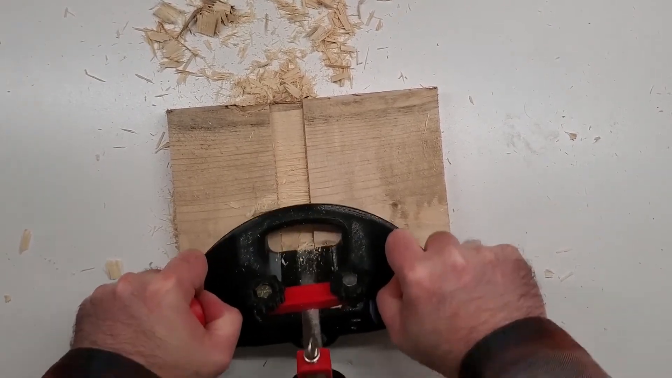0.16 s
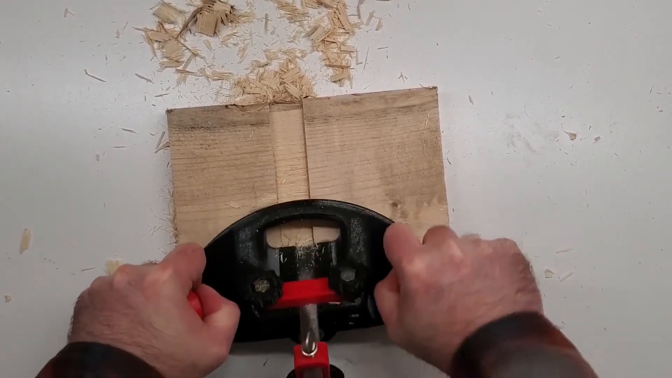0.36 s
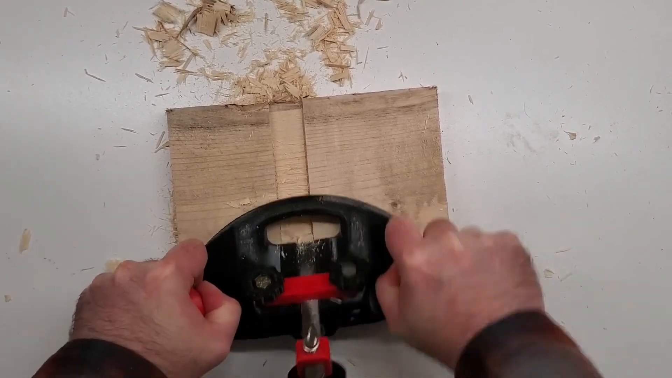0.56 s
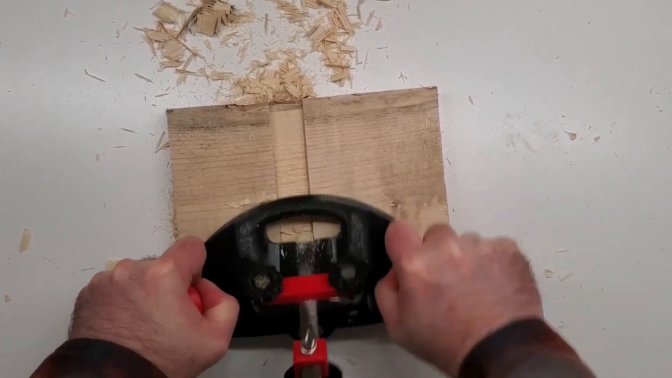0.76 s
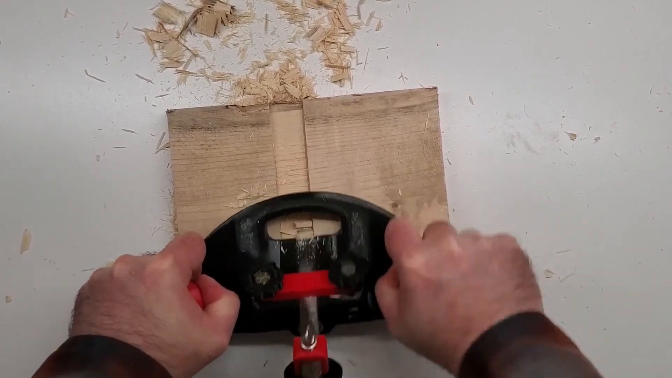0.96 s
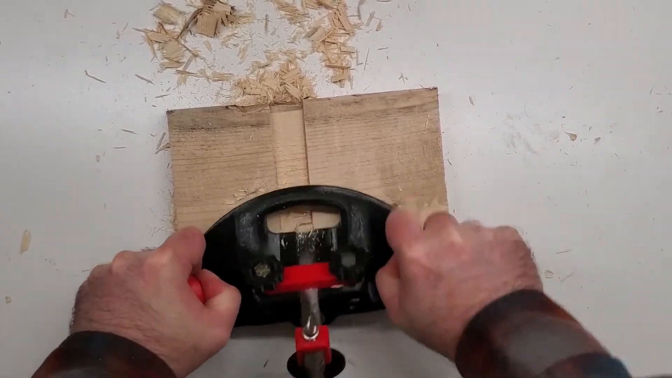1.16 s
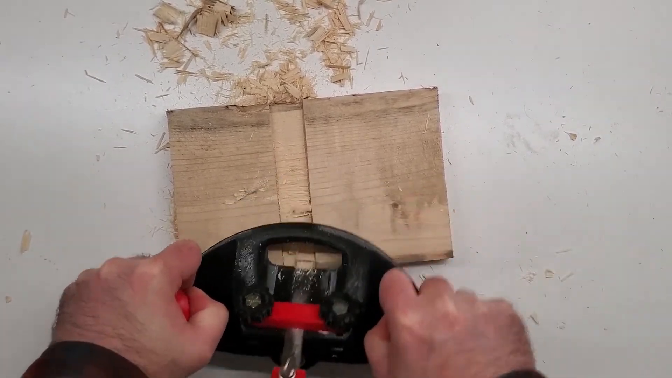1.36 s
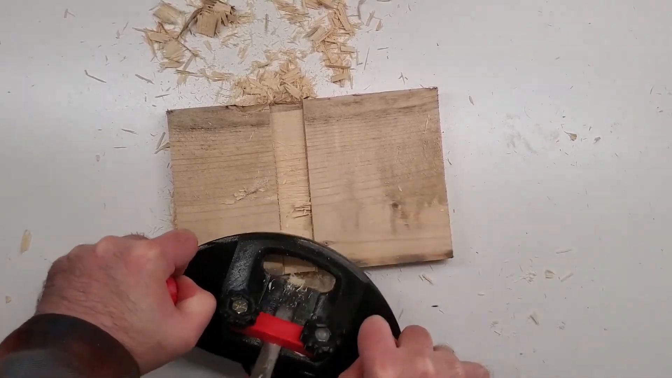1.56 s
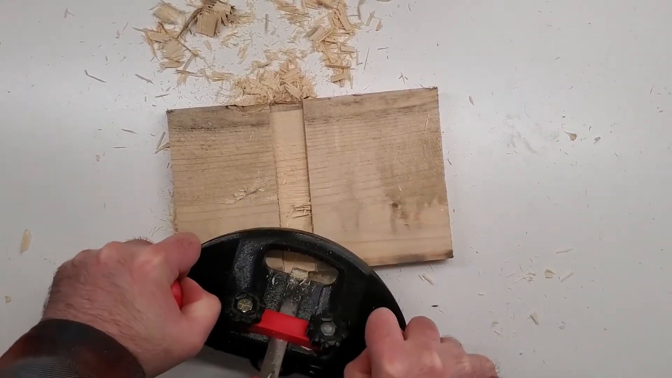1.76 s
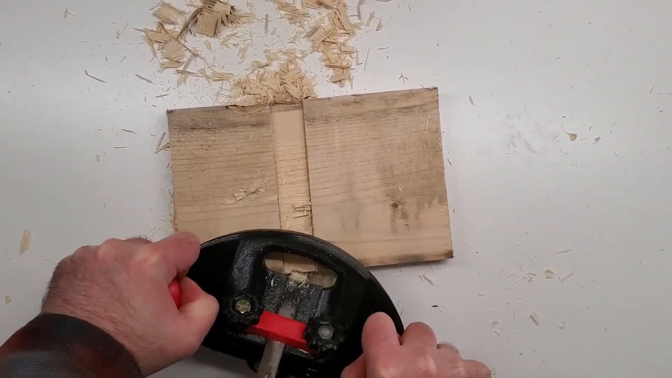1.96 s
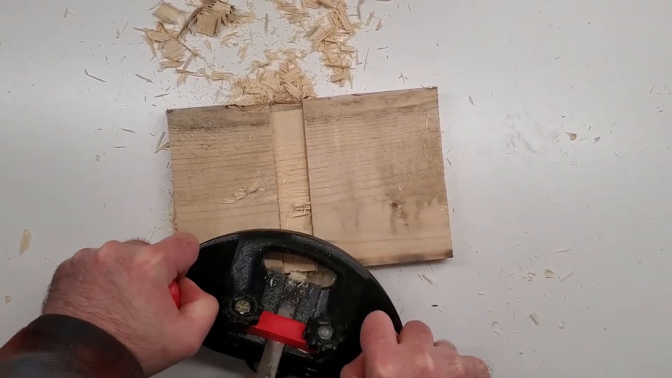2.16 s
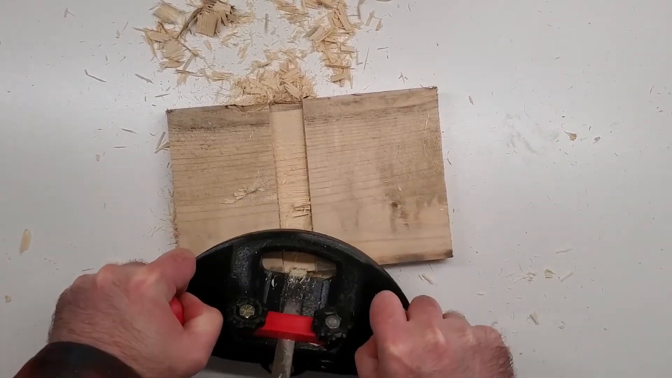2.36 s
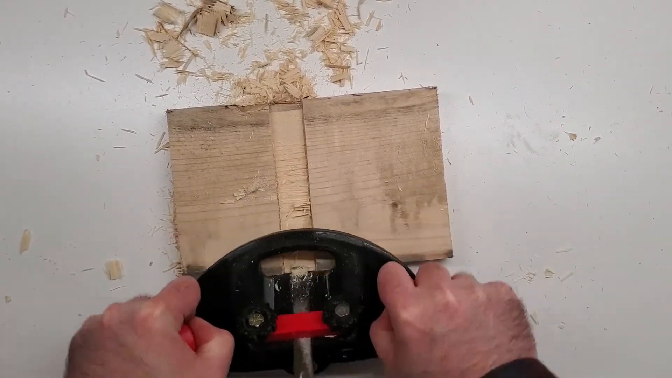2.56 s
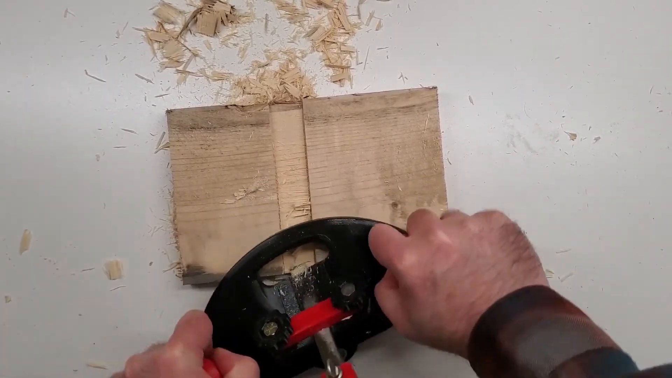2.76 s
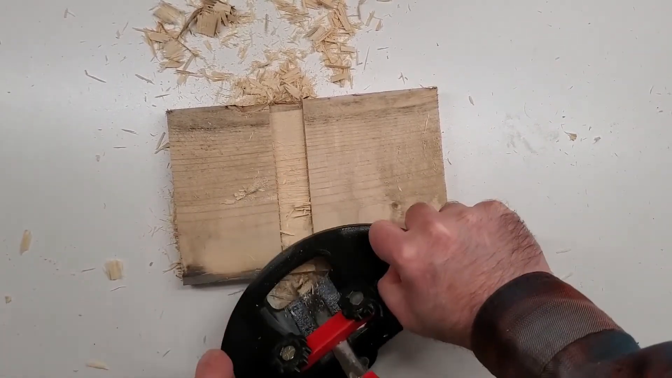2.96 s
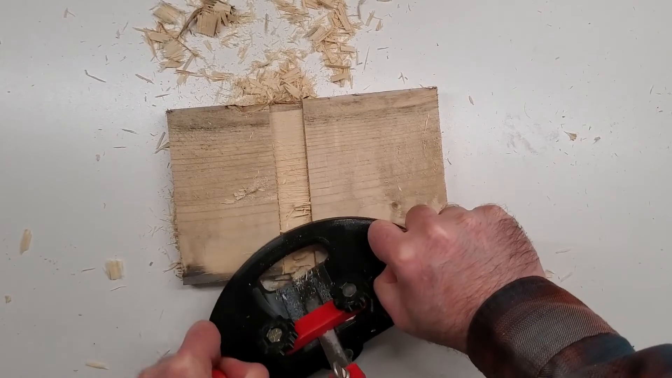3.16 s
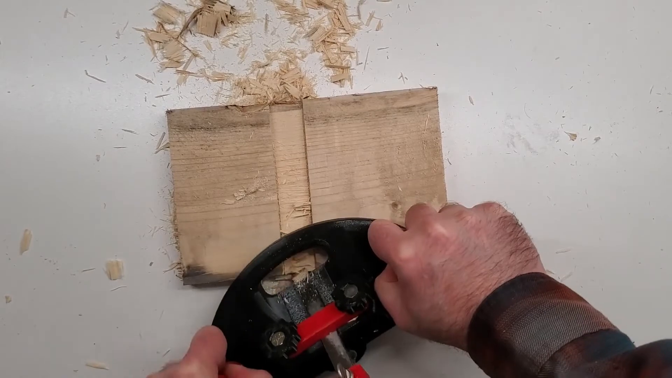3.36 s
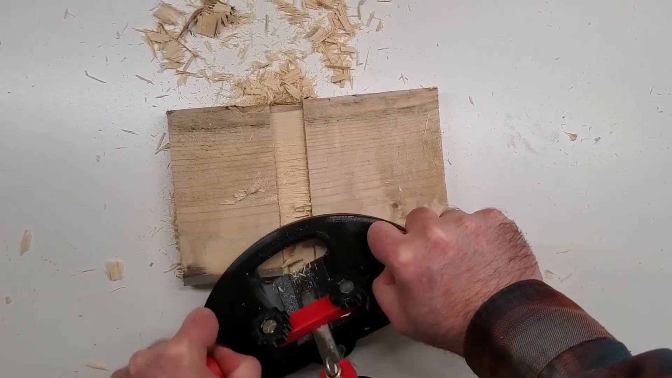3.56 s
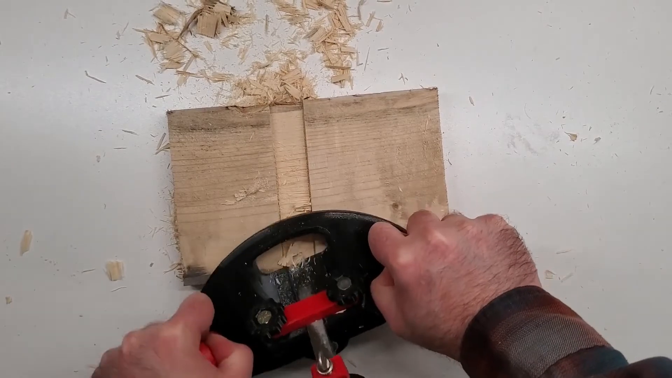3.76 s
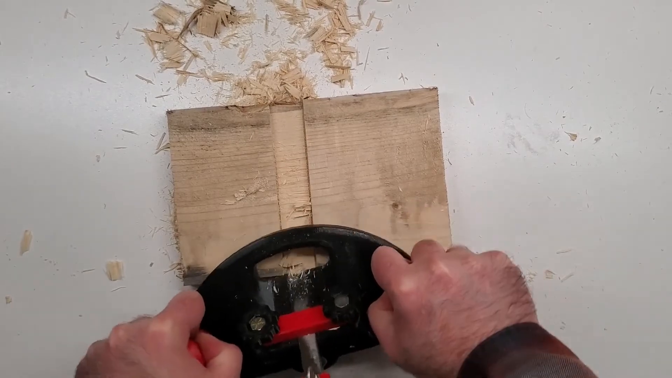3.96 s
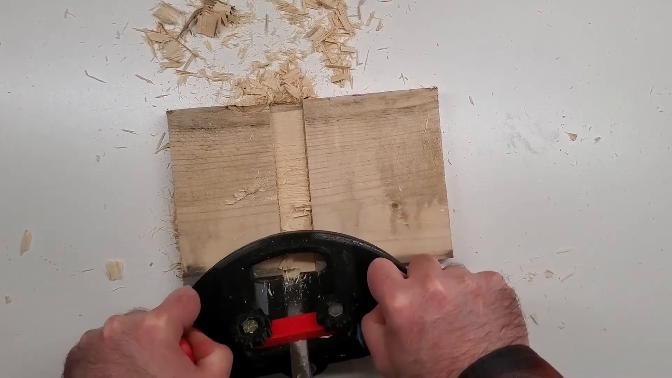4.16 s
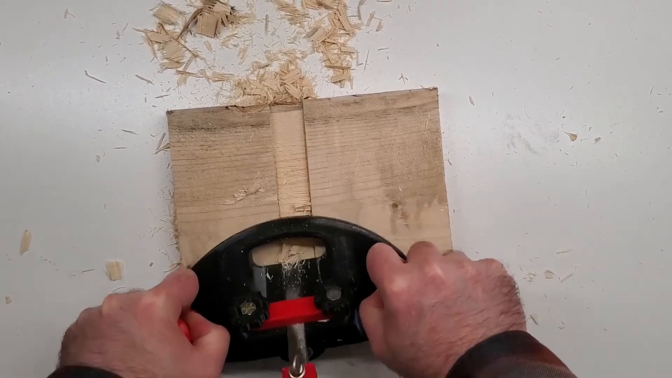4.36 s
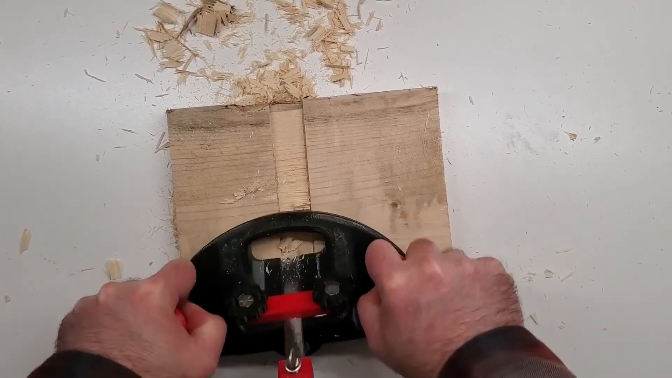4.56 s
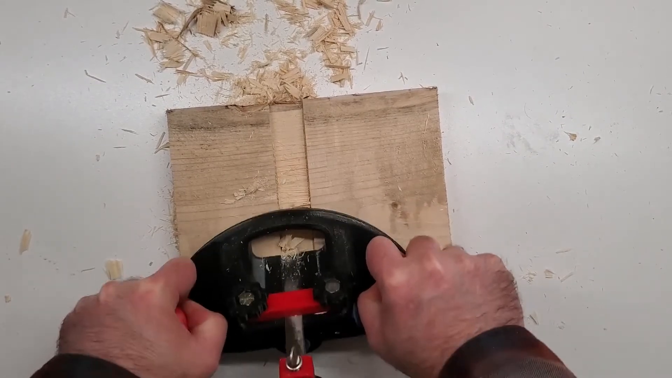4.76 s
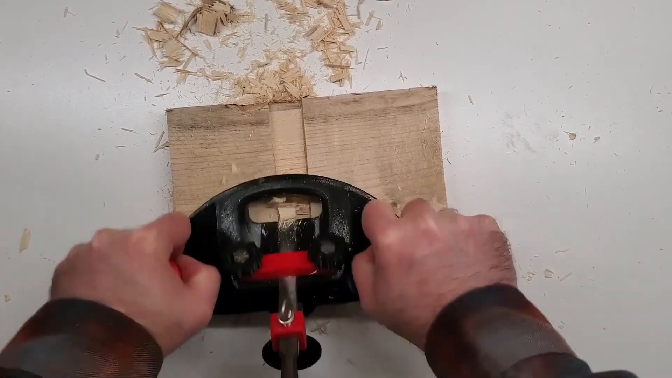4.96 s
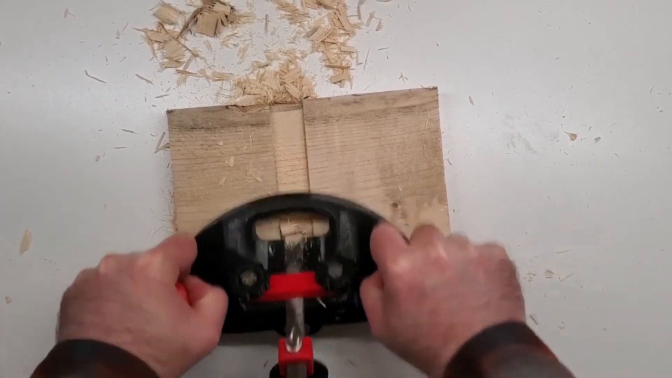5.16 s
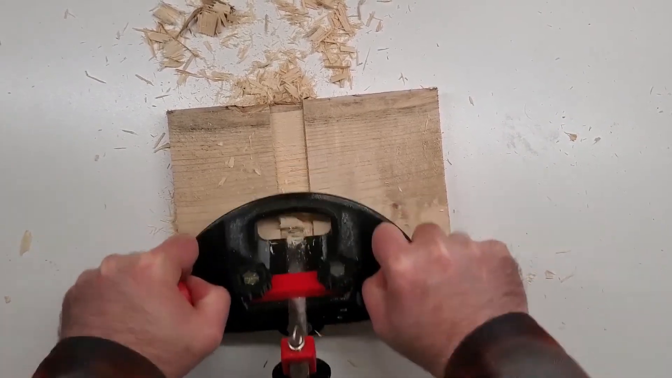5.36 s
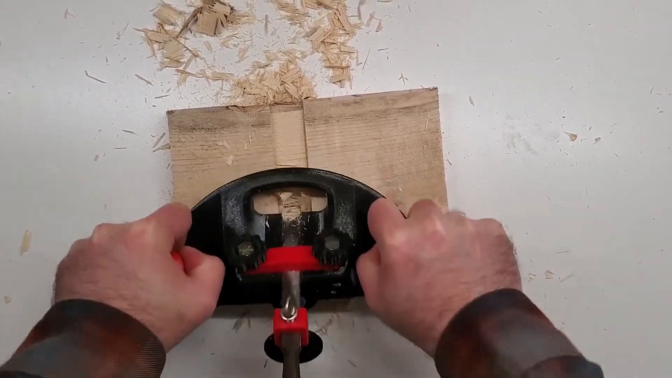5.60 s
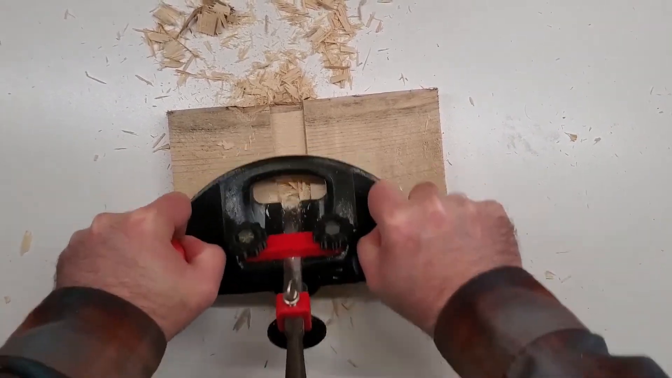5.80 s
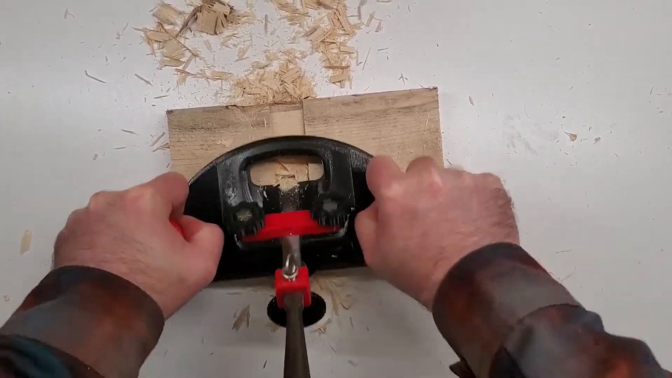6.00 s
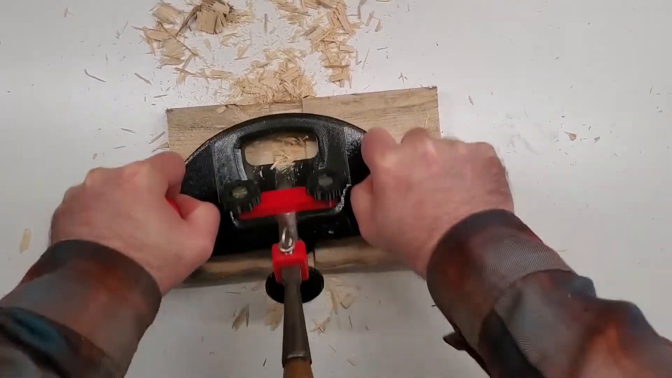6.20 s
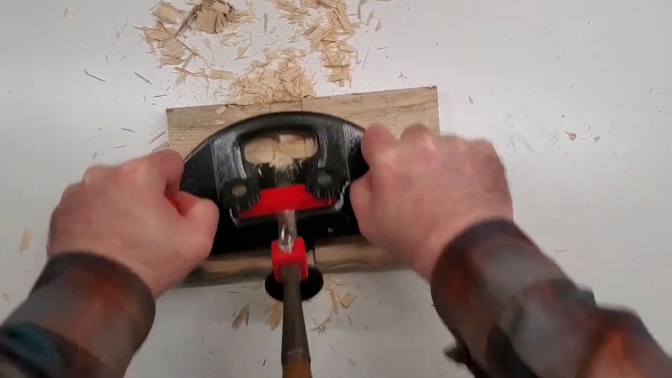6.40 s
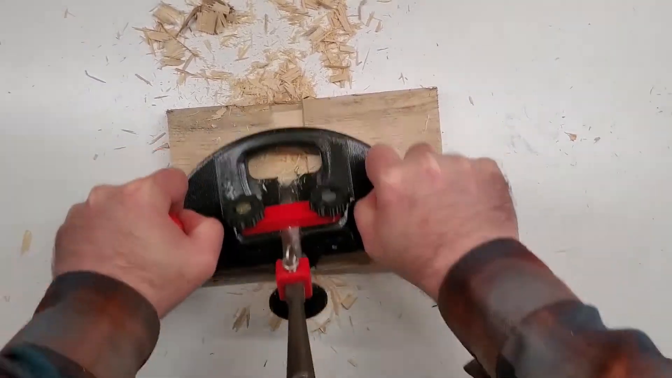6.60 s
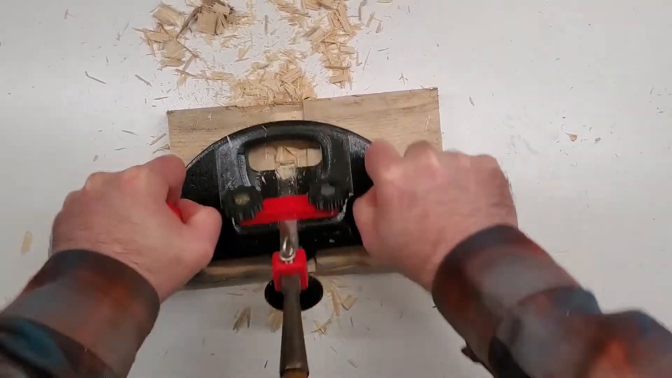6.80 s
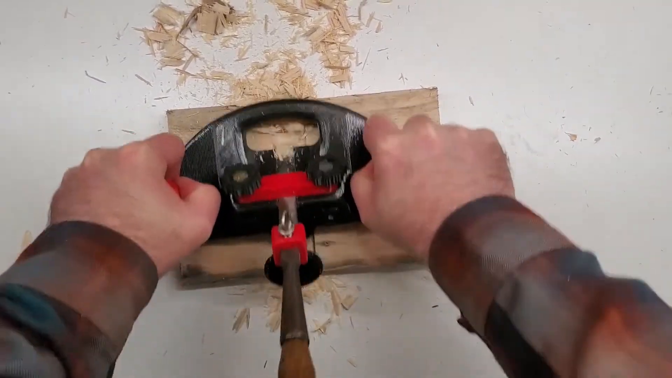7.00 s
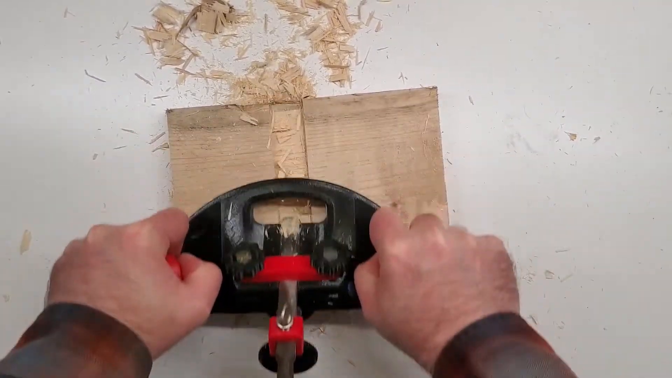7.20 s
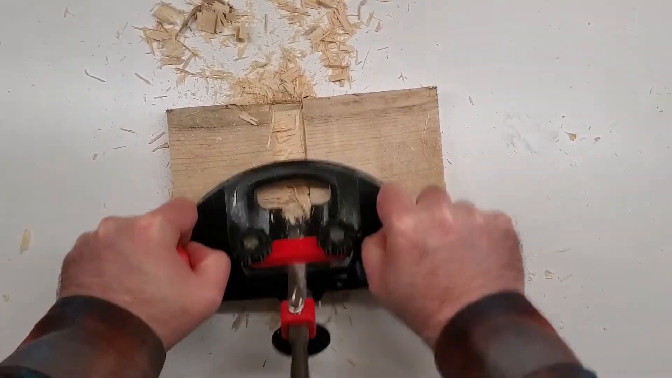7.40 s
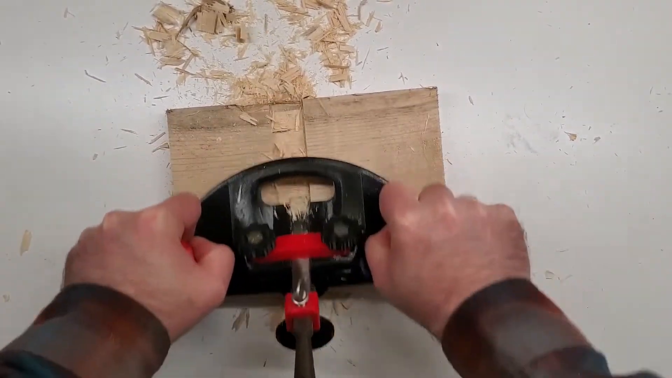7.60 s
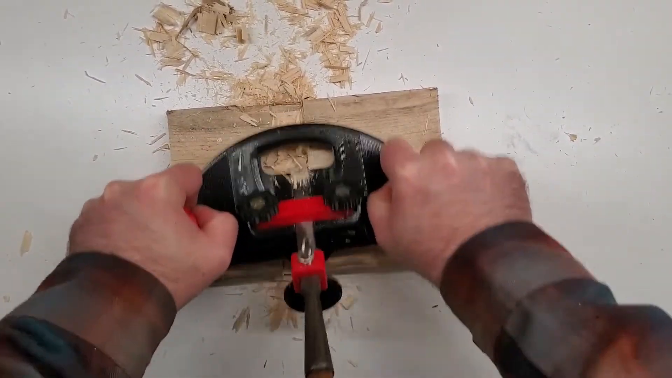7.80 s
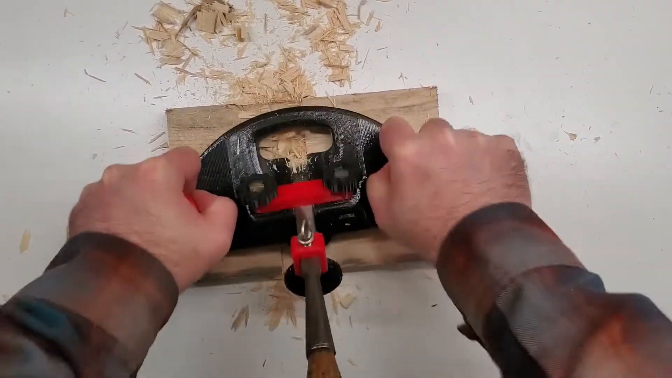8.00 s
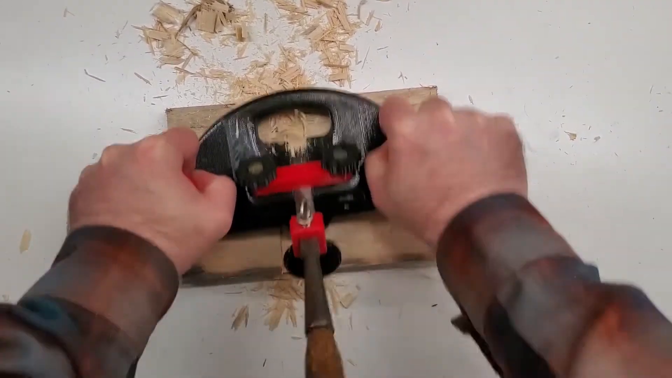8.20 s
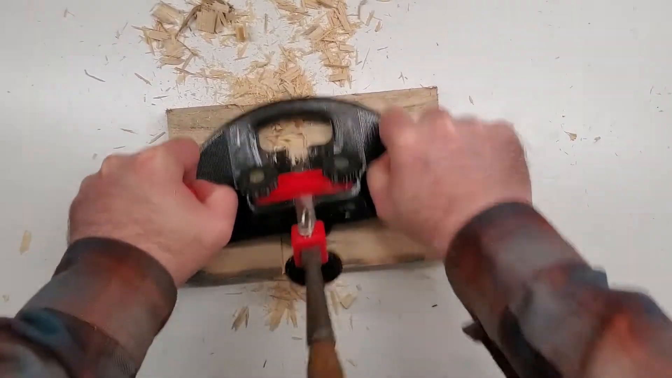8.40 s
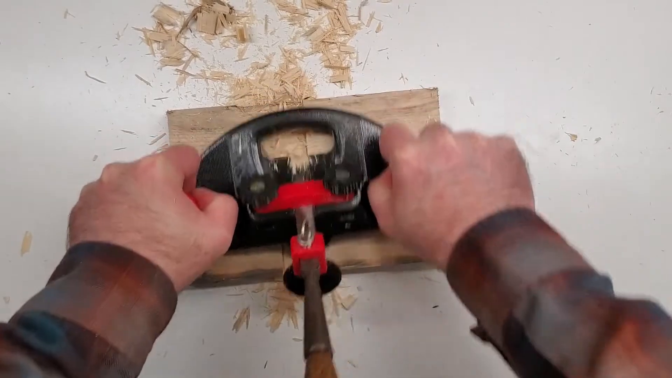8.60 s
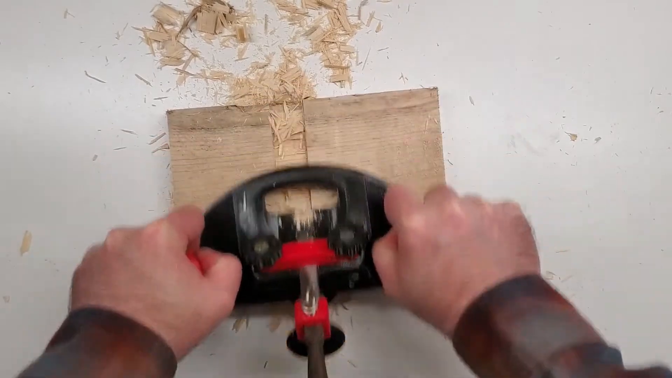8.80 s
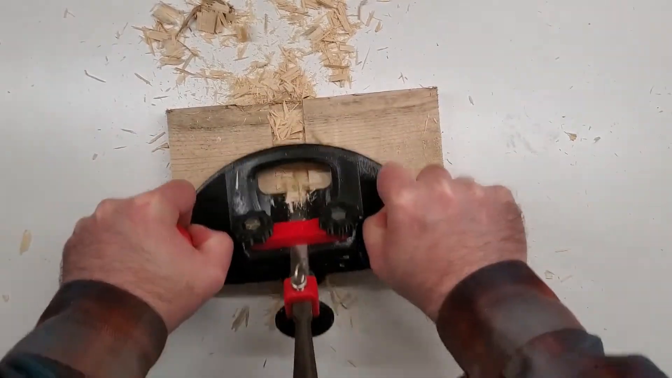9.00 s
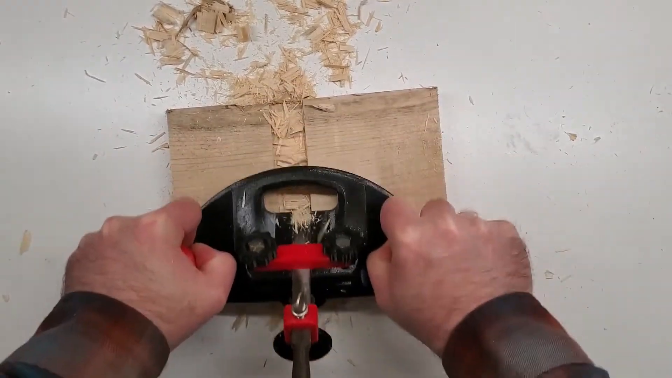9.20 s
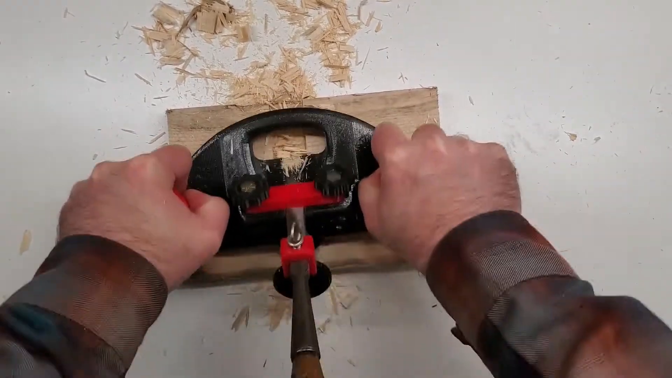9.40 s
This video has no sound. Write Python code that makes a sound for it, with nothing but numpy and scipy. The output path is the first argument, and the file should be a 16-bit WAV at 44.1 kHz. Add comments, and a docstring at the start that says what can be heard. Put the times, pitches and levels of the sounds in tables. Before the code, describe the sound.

Close up in a small workshop, a hand plane pares a wooden groove in short tearing shoves, about four a second. After a second it stops, leaving faint sliding and near silence, then tries a few light strokes. From the middle onward the cuts return louder, with crisp fibre snaps, dull board thuds, softer drags back and a low hollow bench boom. A close stereo microphone pair catches it, with little reverberation.

```python
"""Tearing scrapes first: a router plane pares a groove floor in quick shoves, about four a second, then pauses
and resumes. Tearing, pushing and hissing are grainy noises through blade and board modes and a fine spectrum.
Snaps are noise bursts, thuds soft pushes; the sole drags back and the hollow bench top booms under the shoves.
A small workshop's short noise tail and still air surround it; a close microphone pair hears all."""
import sys
import numpy as np
from scipy import signal
from scipy.fft import rfft, irfft, next_fast_len
from scipy.io import wavfile
from scipy.ndimage import uniform_filter1d

SR = 44100
rng = np.random.default_rng(int(sys.argv[2]) if len(sys.argv) > 2 else 0)


def bounce(signal):
    """Save signal as a 16-bit WAV file at the path given by the first command-line argument."""
    frames = np.transpose(np.atleast_2d(signal))
    limited = np.clip(frames, -1, 1)
    pcm = np.round(limited * 32767).astype(np.int16)
    wavfile.write(sys.argv[1], SR, pcm)


N = 416744  # samples


def gain_of(db):
    """Decibels to gain."""
    return 10 ** (np.asarray(db) / 20)


def read(points, hz):
    """Table value interpolated over log frequency."""
    table_hz, value = np.transpose(points)
    return np.interp(np.log(hz + 1), np.log(table_hz + 1), value)


def through(x, taps):
    """Convolution along time."""
    return signal.oaconvolve(x, np.atleast_2d(taps), axes=1)[:, :N]


def colour(points, size=4096):
    """Causal (minimum-phase) impulse response of unit energy with the given spectrum."""
    hz = abs(np.fft.fftfreq(size, 1 / SR))
    log_gain = np.log(gain_of(np.maximum(read(points, hz), -100)))
    spectrum = np.exp(np.conj(signal.hilbert(log_gain)))
    taps = np.fft.ifft(spectrum).real[:size // 2]
    return taps / np.linalg.norm(taps)


def ring(modes, size=8192):
    """Impulse response of unit energy: decaying sines, wider modes dying sooner."""
    t = np.arange(size) / SR
    taps = np.zeros(size)
    for hz, width_hz, db in modes:
        decay = np.exp(-np.pi * width_hz * t)
        taps += gain_of(db) * np.sqrt(width_hz) * decay * np.sin(2 * np.pi * hz * t)
    return taps / np.linalg.norm(taps)


def rings(modes, force, size):
    """Each mode rings with its own force(hz); the mode gains have unit total energy."""
    share = gain_of([db for hz, width_hz, db in modes])
    share = share / np.linalg.norm(share)
    return sum(through(force(hz), gain * ring([(hz, width_hz, 0)], size=size))
               for (hz, width_hz, db), gain in zip(modes, share))


def nearness(hz, favoured_hz, octaves):
    """1 for a mode at the favoured pitch, falling off on both sides."""
    return np.exp(-.5 * (np.log2(hz / favoured_hz) / octaves) ** 2)


def drift(depth_db, knot_ms):
    """A wandering gain: random dB values joined by straight lines."""
    knots = np.arange(0, N + SR, knot_ms * SR / 1000)
    return gain_of(depth_db * np.interp(np.arange(N), knots, rng.standard_normal(len(knots))))


def grains(per_s, spread_db, smooth, clump_db, clump_ms):
    """Two rows (mid, side) of tiny fractures that come in clumps over a smooth rub; power 1."""
    size = gain_of(spread_db * np.minimum(rng.exponential(1, N), 5))
    size = size * (rng.random(N) < per_s / SR)
    power = smooth + (1 - smooth) * size ** 2 / np.mean(size ** 2)
    size = np.sqrt(power) * drift(clump_db, clump_ms)
    return size / np.sqrt(np.mean(size ** 2)) * rng.standard_normal((2, N))


def blows(s, shapes):
    """Lays one short force (mid, side) at each moment, times a strength per blow."""
    at = np.round(s * SR).astype(int)[:, None] + np.arange(shapes.shape[-1])

    def force(strength):
        out = np.zeros((2, N + shapes.shape[-1]))
        np.add.at(out, (slice(None), at), np.moveaxis(shapes * strength[:, None, None], 1, 0))
        return out
    return force


# still air spectrum: hz, density_db (relative)
AIR_SPECTRUM = [(15, -26), (25, -6), (70, -6.5), (242, 1), (317, -14), (394, -2.5), (575, -9), (2410, -24),
                (6380, -42), (14800, -33.5), (16000, -36.5)]
AIR_DB = -67.5


def still_air():
    """Steady noise of the air, independent in mid and side."""
    return gain_of(AIR_DB) * through(rng.standard_normal((2, N)), colour(AIR_SPECTRUM))


# workshop decay: hz, t60_s
ROOM_DECAY = [(100, 0.17), (500, 0.29), (3000, 0.27), (10000, 0.22)]


def room(x):
    """Sparse taps of random sign, each band dying at its own speed."""
    taps = np.zeros((2, SR // 2))
    at = np.arange(200, SR // 2 - 20, 20)
    at = at + rng.integers(0, 20, (2, len(at)))
    np.put_along_axis(taps, at, rng.choice([-1., 1.], at.shape), 1)
    hz, t, bands = signal.stft(taps, SR, nperseg=256)
    t60_s = np.maximum(read(ROOM_DECAY, hz), .05)[:, None]
    tail = signal.istft(bands * gain_of(-60 * t / t60_s), SR, nperseg=256)[1]
    return through(x, tail / np.linalg.norm(tail[0]))


# faint rub of the tool lying on the work between strokes: start_s, rub_db, rock_db (relative levels)
REST = [(0, -55, -34.5), (1.3, -49.5, -33), (1.46, -67.5, -60), (1.7, -74, -64), (1.8, -72, -58),
        (2.1, -86, -71), (2.16, -62, -62), (2.45, -68, -49), (2.9, -70, -53), (3.15, -72.5, -64),
        (3.3, -60.5, -36), (4.0, -51, -42.5), (4.25, -69.5, -61), (4.4, -46.5, -35), (7.2, -66, -40),
        (7.42, -50.5, -52), (7.5, -44, -42), (9.2, -57.5, -38), (9.35, -52.5, -48)]


def effort(rest_db, *kinds):
    """Gain over time: strokes rise, glide from first to last level and fall; powers add over the rest."""
    t = np.arange(0, N / SR + .01, .001)
    power = gain_of(2 * np.interp(t, np.transpose(REST)[0], rest_db))
    for start, end, first_db, last_db, (rise_db_per_s, fall_db_per_s) in kinds:
        for a, b, c, d in zip(start, end, first_db, last_db):
            level_db = np.interp(t, [a - 1, a, b, b + 1], [c - rise_db_per_s, c, d, d - fall_db_per_s])
            power = power + gain_of(2 * level_db)
    return np.interp(np.arange(N) / SR, t, np.sqrt(power))


# lowest bench top modes: hz, width_hz, level_db
BENCH_MODES = [(39.6, 16, -8), (56.9, 2.7, 0.5), (71.3, 10.6, 8.5), (92.4, 22, 8.5)]
# forward cuts, relative levels: bite_s, let_go_s, bite_tear_db, let_go_tear_db, push_re_tear_db,
# fine_hiss_re_tear_db, bench_rock_db, chatter_hz, chatter_lift_db
SHOVES = [ (0.0, 0.005, -20.5, -30.5, 7, -13, -16, 1500, -1),
          (0.208, 0.249, -28.5, -35, 12, -9, -21.5, 2240, 20),
          (0.443, 0.482, -26, -29, 7.5, -11.5, -17, 1500, -6),
          (0.652, 0.694, -29, -22, 5.5, -13.5, -25, 1520, -5),
          (0.867, 0.915, -35.5, -22.5, 6.5, -15, -25.5, 1470, -6),
          (1.09, 1.137, -34, -22, 0.5, -14, -26.5, 1060, 9),
          (2.33, 2.334, -36.5, -36, 0, -9, -33, 1500, -1),
          (2.581, 2.671, -47, -44.5, 8.5, -7.5, -38.5, 2600, 7.5),
          (3.266, 3.287, -41, -29, 2, -11.5, -30, 1200, 0),
          (3.514, 3.548, -32, -28, 8.5, -8.5, -21.5, 1180, 14),
          (3.752, 3.797, -38, -32, 5, -13, -19.5, 1600, 8),
          (4.34, 4.379, -36.5, -26, 8, -11.5, -30, 1270, 4),
          (4.593, 4.625, -31, -26.5, 11, -13, -17.5, 3200, 1),
          (4.78, 4.794, -30.5, -23, 9, -11, -20.5, 1500, -8),
          (5.003, 5.041, -20.5, -15.5, 5.5, -8.5, -17, 1500, -28),
          (5.293, 5.317, -26, -23.5, 8, -14, -17, 1810, 11),
          (5.51, 5.534, -21, -17, 3.5, -10.5, -14, 1507, -15),
          (5.748, 5.8, -27.5, -29, 10.5, -11.5, -18.5, 1890, 6),
          (5.979, 6.025, -24, -28, 12, -11, -18, 1070, 8.5),
          (6.203, 6.23, -28.5, -19.5, 6.5, -7.5, -21.5, 1630, 8.5),
          (6.233, 6.261, -23, -27.5, 9.5, -7.5, -20.5, 3030, 3),
          (6.466, 6.534, -31.5, -22, 5.5, -13.5, -19.5, 1480, 8),
          (6.707, 6.774, -33.5, -21.5, 9.5, -15, -18, 1492, 0),
          (6.976, 7.01, -28.5, -25, 8.5, -12.5, -17.5, 1070, 15.5),
          (7.253, 7.259, -38, -34.5, 10, -12, -32, 1300, 3),
          (7.475, 7.498, -26, -29.5, 13.5, -15, -23, 1260, 5.5),
          (7.527, 7.562, -24, -26, 6, -12.5, -22.5, 1497, 0),
          (7.773, 7.819, -29.5, -24.5, 9.5, -10, -20, 1395, 12),
          (7.999, 8.044, -34.5, -26.5, 10.5, -11, -25.5, 1600, 10),
          (8.27, 8.298, -17.5, -24, 5.5, -15.5, -16.5, 1157, 16),
          (8.498, 8.538, -38, -31, 8, -10.5, -27, 1190, 20),
          (9.026, 9.111, -31.5, -33, 11, -9, -21, 1874, 16.5),
          (9.393, 9.448, -27.5, -33, 8, -12.5, -32.5, 1820, 6)]
# sole sliding without cutting, relative levels: start_s, end_s, rub_db, push_re_rub_db, fine_hiss_re_rub_db
DRAGS = [ (0.077, 0.12, -37.5, 7, -22), (0.32, 0.37, -39, 11, -15), (0.556, 0.59, -41, 11.5, -17),
         (0.78, 0.808, -38.5, 11, -14.5), (0.994, 1.03, -43.5, 10, -9), (1.208, 1.328, -48, 6.5, -9),
         (1.379, 1.393, -45.5, 1, -17), (1.752, 1.757, -57, 7, -19), (1.985, 1.989, -62, -4.5, -22),
         (2.16, 2.15, -53, 14.5, -25), (2.211, 2.265, -50, 6, -16.5), (2.37, 2.445, -59, 10, -9),
         (2.707, 2.884, -51, 5.5, -11.5), (2.986, 3.021, -46.5, 7.5, -18.5), (3.32, 3.407, -44, 9, -13),
         (3.585, 3.7, -49, 10, -16), (3.952, 3.986, -45.5, 5.5, -15.5), (4.032, 4.102, -54.5, -8, -19),
         (4.13, 4.2, -61, 5, -26), (4.497, 4.53, -39, 7.5, -17.5), (4.894, 4.934, -48.5, 12.5, -12),
         (5.153, 5.23, -44.5, 10.5, -6.5), (5.256, 5.278, -36.5, 9, -14), (5.365, 5.433, -42, 11.5, -9),
         (5.586, 5.67, -46, 6, -10), (5.853, 5.918, -45.5, 10, -7), (6.08, 6.147, -45, 15, -9),
         (6.356, 6.41, -41, 5.5, -8), (6.601, 6.651, -40, 10, -9), (6.82, 6.922, -40.5, 5.5, -10.5),
         (6.954, 6.968, -32, 5, -13), (7.086, 7.22, -36, 7.5, -12.5), (7.283, 7.343, -45.5, 8, -15),
         (7.64, 7.692, -42.5, 12, -9.5), (7.903, 7.932, -38.5, 7, -10), (8.153, 8.249, -45, 0, -8),
         (8.373, 8.422, -42, 5, -11), (8.623, 8.718, -43.5, 9, -9.5), (8.753, 8.83, -45.5, 3, -9),
         (8.815, 8.866, -46.5, 16.5, -3), (8.885, 8.924, -44.5, 17.5, -8), (8.989, 9.001, -46, 13.5, -10),
         (9.183, 9.278, -41.5, 10, -10)]
# (rise, fall) in dB per s around a stroke
CUT_ROCK, SLIDE_PUSH = (970, 243), (740, 570)
SLIDE_ROCK_DB = -4.5  # re rub


def bench():
    """Uneven shoves rock the bench top in its lowest modes, hardest as the blade lets go."""
    bite, go, _, _, _, _, rock_db, _, _ = np.transpose(SHOVES)
    start, end, rub_db = np.transpose(DRAGS)[:3]
    slide_db = rub_db + SLIDE_ROCK_DB
    rock = effort(np.transpose(REST)[2],
                  (bite, go, rock_db - 6.0, rock_db, CUT_ROCK),
                  (start, end, slide_db, slide_db, SLIDE_PUSH))
    force = grains(300, 1.3, 0.55, 2.3, 24.0) * rock
    return through(force, ring(BENCH_MODES, size=16384))


# board modes: hz, width_hz, level_db
BOARD_MODES = [(149.5, 17, -5), (175, 39, -8), (213.7, 24, -1), (246, 37, -1.5), (287.2, 55, 0),
               (326.7, 87, -4), (391.7, 19.4, 0.5), (478.6, 58, -7.5), (530, 210, -20.5)]
# blade catches and jolts the board: start_s, level_db (relative), favoured_hz
THUDS = [(0.227, -8.5, 250), (0.316, -21.5, 244), (0.464, -9, 230), (0.65, -15, 255), (0.673, -6, 208),
         (0.895, -10, 228), (0.91, -6, 229), (1.095, -15.5, 277), (1.13, -7, 230), (2.575, -29, 480),
         (3.282, -20, 390), (3.516, -14.5, 184), (3.538, -14, 145), (3.645, -28.5, 407),
         (3.798, -15.5, 210), (3.908, -21.5, 346), (4.612, -17, 248), (4.633, -14.5, 248), (4.791, -9, 248),
         (4.993, -8, 261.5), (5.033, -7.5, 288), (5.056, -17, 377), (5.295, -10, 225), (5.312, 0, 233),
         (5.509, -7, 290), (5.534, -8.5, 392), (5.757, -8.5, 262), (5.79, -8, 220), (5.987, -11, 241),
         (6.018, -4.5, 210), (6.214, -9.5, 268), (6.23, -17, 394), (6.466, -15, 200), (6.51, -10, 190),
         (6.541, -9, 176), (6.747, -10, 204), (6.765, -12, 221), (6.995, -9.5, 145.6), (7.204, -18.5, 210),
         (7.249, -15.5, 310), (7.49, -9.5, 295), (7.544, -11, 253.5), (7.773, -9.5, 275), (7.797, -12, 242),
         (8.282, -18, 230), (8.532, -20.5, 220), (8.817, -23.5, 199), (8.859, -22.5, 299),
         (8.889, -14.5, 197), (8.92, -17.5, 263), (9.033, -8, 287), (9.067, -11.5, 240),
         (9.398, -18.5, 232)]


def thuds():
    """Soft pushes of about a millisecond ring the board, each mode with a random sign, and the bench."""
    s, db, favoured_hz = np.transpose(THUDS)
    force = blows(s, rng.choice([-1., 1.], (len(s), 2, 1)) * np.hanning(60))

    def board_force(hz):
        sign = rng.choice([-1., 1.], len(s))
        return force(sign * gain_of(db + 12.76 * nearness(hz, favoured_hz, 0.13) - 14.))
    knock = through(force(gain_of(db - 39.0)), np.hanning(70))  # the bare push, without ringing
    bench_top = through(force(gain_of(db - 15.0)), ring(BENCH_MODES, size=16384))
    return rings(BOARD_MODES, board_force, size=8192) + bench_top + knock


SPLINTERS_PER_S = 70
SPLINTER_DB, SPLINTER_SPREAD_DB = 3, 10.5  # loudest re tear; random reduction up to
# (from, to) of the random picks
SPLINTER_LOW_HZ, SPLINTER_HIGH_HZ, SPLINTER_CRACK_DB = (1000, 1840), (1800, 3500), (-24, -6.5)


def splinters():
    """Further snaps while the blade cuts: rows like those of SNAPS, drawn at random."""
    def pick(ends, u):
        return ends[0] + (ends[1] - ends[0]) * u

    rows = []
    for bite, go, bite_db, go_db, *_ in SHOVES:
        when, keep, size, low, high, crack = rng.random((12, 6)).T  # 12 candidates per cut
        s = bite + when * (go - bite)
        db = pick((bite_db, go_db), when) + SPLINTER_DB - SPLINTER_SPREAD_DB * size
        low_hz, high_hz = pick(SPLINTER_LOW_HZ, low), pick(SPLINTER_HIGH_HZ, high)
        candidates = np.transpose([s, db, low_hz, high_hz, pick(SPLINTER_CRACK_DB, crack)])
        kept = (keep * len(s) < SPLINTERS_PER_S * (go - bite)) & (s < (N - 1) / SR)
        rows += list(candidates[kept])
    return rows


# blade modes: hz, width_hz, level_db
BLADE_MODES = [(724.3, 58, 5), (847, 43, 0.5), (1101, 35, 0.5), (1273, 134, 3.5), (1505, 102, 4),
               (1711, 140, 6.5), (1960, 82, -1), (2253, 100, -1), (2645, 610, 5.5), (3100, 250, -2.5),
               (3426, 97, -9.5), (4580, 900, -9)]
# tearing between the blade modes: hz, density_db (relative)
TEAR_SPECTRUM = [(300, -50), (600, -4.5), (1000, -2), (3000, -7), (4200, -17), (6000, -39.5), (8000, -17),
                 (10000, -36)]
# fine hiss of the edge: hz, density_db (relative)
FINE_SPECTRUM = [(3240, -37.5), (5500, -10), (6600, -10.5), (7260, -9.5), (7840, -10), (9360, -2.5),
                 (12400, -7.5), (13200, -8), (15000, -9), (15500, -9.5), (16300, -10.5)]
# fibre snaps and sole taps that stand out, loud ones and lone faint ones:
# start_s, level_db (relative), low_favoured_hz, high_favoured_hz, crack_re_level_db
SNAPS = [(0.202, -23, 1200, 2220, -21), (0.24, -21.5, 1500, 2270, -20), (0.443, -22.5, 1490, 2900, -21),
         (0.686, -20, 1480, 3420, -19), (1.13, -20.5, 1048, 2190, -16), (2.146, -38.5, 1230, 2480, -25),
         (2.338, -32, 1570, 2820, -14), (2.579, -41, 800, 2070, -24), (3.282, -20, 1268, 3100, -6.5),
         (3.525, -21, 1150, 2300, -13), (3.542, -24, 1410, 1780, -16), (4.341, -32, 1240, 2500, -10),
         (4.377, -23.5, 1270, 2220, -5), (4.607, -20.5, 1270, 2070, -20), (4.629, -16.5, 1316, 3200, -16.5),
         (4.79, -31, 1490, 2190, -17), (4.984, -23.5, 1500, 2280, -21), (5.039, -25, 1340, 3120, -3),
         (5.051, -16, 1932, 2540, -8), (5.064, -18.5, 1630, 2650, -6), (5.292, -22, 1310, 1907, -19),
         (5.309, -18.5, 1700, 1884, -13), (5.511, -13, 1710, 3220, -12), (5.533, -5, 1344, 3220, -28),
         (5.548, -9, 1180, 2240, -24), (5.73, -23.5, 1806, 2250, -8), (5.792, -18, 1430, 2700, -4),
         (5.967, -31, 1500, 2580, -8), (5.982, -12.5, 1527, 3110, -5.5), (6.017, -17, 1100, 3000, -12),
         (6.198, -19.5, 1370, 1800, -11), (6.23, -14, 1610, 3100, -9), (6.469, -21, 1400, 3100, -12),
         (6.518, -15, 1473, 2970, -20), (6.705, -26.5, 1310, 3460, -8.5), (6.759, -15.5, 1240, 2740, -6.5),
         (6.995, -19, 1714, 2740, -20), (7.01, -15.5, 1475, 3330, -6), (7.253, -18.5, 1283, 1980, -33),
         (7.478, -16, 1430, 2464, -11), (7.491, -24, 1256, 2390, -24), (7.687, -25.5, 1440, 3100, -8.5),
         (7.763, -23, 1050, 1830, -11), (7.8, -20.5, 1390, 1786, -17), (8.022, -22, 1463, 2850, -12),
         (8.041, -18.5, 1490, 3756, -14), (8.269, -16, 1590, 3910, -9.5), (8.277, -14, 1080, 2410, -13),
         (8.296, -17.5, 1500, 1890, -10), (8.864, -28.5, 1900, 3280, -6), (9.027, -21, 1580, 1954, -6.5),
         (9.092, -25.5, 1697, 3110, -4)]


def snaps():
    """Each snap is a noisy burst of a few milliseconds into blade and edge."""
    s, db, low_hz, high_hz, crack_db = np.transpose(SNAPS + splinters())
    fade = np.exp(-np.arange(400) / SR / .0016)
    bursts = rng.standard_normal((len(s), 2, len(fade))) * fade
    burst_norm = np.linalg.norm(bursts, axis=2, keepdims=True)
    force = blows(s, bursts * np.linalg.norm(fade) / burst_norm)

    def blade_force(hz):
        lift_db = 20.5 * nearness(hz, low_hz, 0.051) + 20.5 * nearness(hz, high_hz, 0.062)
        return force(gain_of(db + lift_db - 10.0))
    blade = rings(BLADE_MODES, blade_force, size=2048)
    tear = through(force(gain_of(db - 9.5)), colour(TEAR_SPECTRUM))
    crack = through(force(gain_of(db + crack_db + 3.5)), colour(FINE_SPECTRUM))
    return blade + tear + crack


# slides that whistle hoarsely near one pitch: start_s, end_s, favoured_hz, lift_db
WHISTLES = [(.53, 0.555, 1280, 11), (6.6, 6.66, 1470, 10), (8.6, 8.7, 1480, 8.5), (8.65, 8.67, 3520, 19),
            (8.818, 8.847, 1730, 15.5), (8.865, 8.914, 1980, 23.5), (0.32, 0.36, 2260, 11),
            (6.36, 6.39, 1480, 4.5), (8.213, 8.23, 2000, 8), (8.876, 8.903, 3330, 14)]
CHATTER_LEAD_S, CHATTER_LINGER_S = 0.0064, 0.038


def chatter(hz):
    """Gain of one blade mode over time: changed during strokes with a favoured pitch near it."""
    lift_db = np.zeros(N)
    for start, end, *_, favoured_hz, stroke_lift_db in SHOVES + WHISTLES:
        first = max(round((start - CHATTER_LEAD_S) * SR), 0)
        last = round((end + CHATTER_LINGER_S) * SR)
        lift_db[first:last] += stroke_lift_db * nearness(hz, favoured_hz, 0.11)
    return gain_of(uniform_filter1d(lift_db, size=500))


# (rise, fall) in dB per s around a stroke
CUT_TEAR, CUT_PUSH, CUT_FINE = (1440, 570), (1100, 292), (2430, 570)
SLIDE_TEAR, SLIDE_FINE = (630, 660), (360, 370)
REST_PUSH_DB, REST_FINE_DB = 8.5, -13  # re rub
# the blade creeps up to the fibres before it bites; level re bite, (rise, fall) in dB per s
CREEP_S, CREEP_DB, CREEP = 0.024, -17, (1500, 1200)


def strokes():
    """Tearing rings the blade, the push rings the board, the edge hisses; each has its own grain."""
    bite, go, bite_db, go_db, cut_push, cut_fine = np.transpose(SHOVES)[:6]
    start, end, rub_db, slide_push, slide_fine = np.transpose(DRAGS)
    rest_db = np.transpose(REST)[1]

    def layer(cut, slide, rest, cut_slopes, slide_slopes):
        first_db, slide_db = bite_db + cut, rub_db + slide
        return effort(rest_db + rest,
                      (bite, go, first_db, go_db + cut, cut_slopes),
                      (bite - CREEP_S, bite, first_db + CREEP_DB, first_db + CREEP_DB / 2, CREEP),
                      (start, end, slide_db, slide_db, slide_slopes))

    tear = grains(900, 2.64, 0.84, 1.57, 5.) * layer(0, 0, 0, CUT_TEAR, SLIDE_TEAR)
    push = grains(600, 1.86, 0.61, 2.57, 13.0) * gain_of(-9.0)
    push = push * layer(cut_push, slide_push, REST_PUSH_DB, CUT_PUSH, SLIDE_PUSH)
    fine = grains(2000, 2.7, 0.69, 3.4, 5.5) * gain_of([[-.6], [-1.5]])  # mid, side
    fine = fine * layer(cut_fine, slide_fine, REST_FINE_DB, CUT_FINE, SLIDE_FINE)

    def blade_force(hz):
        return tear * drift(7.23, 17.0) * chatter(hz) * gain_of(-10.0)

    def board_force(hz):
        return push * drift(2.0, 30.)
    blade = rings(BLADE_MODES, blade_force, size=2048)
    board = rings(BOARD_MODES, board_force, size=8192)
    between_modes = gain_of(-11.0) * through(tear, colour(TEAR_SPECTRUM))
    return blade + between_modes + board + through(fine, colour(FINE_SPECTRUM))


def scene():
    """Mid and side rows of tool, bench, room and still air."""
    tool = strokes() + snaps() + thuds()
    return tool + gain_of(-16.0) * room(tool) + bench() + still_air()


# stereo width: hz, side_re_mid_db
WIDTH = [(60, -3), (95, -7), (150, -14.5), (240, -14.5), (380, -16), (600, -4.5), (950, -4.5), (1500, -5.5),
         (2380, -3.5), (3770, -1.5), (5980, 0), (9470, -15), (15000, -11.5)]
# stereo lean: hz, left_re_right_db
LEAN = [(60, -12.5), (110, -1.5), (200, -1.5), (380, 0.5), (700, -2.5), (1290, 1.5), (2380, -3.5),
        (4400, 0), (8120, 1), (15000, -0.5)]
EDGE_HZ = 16000  # upper band limit


def record(dry):
    """The microphone pair makes left and right, its amplifier rounds the highest peaks; then the band limit."""
    size = next_fast_len(N)
    hz = np.fft.rfftfreq(size, 1 / SR)
    mid, side = rfft(dry, size)
    lean = gain_of(read(LEAN, hz))
    along = (lean - 1) / (lean + 1)  # part of the side that only leans the mid
    free = np.sqrt(np.maximum(gain_of(2 * read(WIDTH, hz)) - along ** 2, 1e-3))
    side = along * mid + side * free
    pair = irfft(np.array([mid + side, mid - side]), size)[:, :N]
    # the capsules lose the deepest bass
    pair = signal.sosfilt(signal.butter(8, 39., "high", fs=SR, output="sos"), pair)
    pair = np.tanh(pair / .97) * .97
    band_limit = signal.firwin(511, EDGE_HZ, window=("kaiser", 9), fs=SR)
    return signal.oaconvolve(pair, band_limit[None], "same")


dry = scene()
out = record(dry)
bounce(out)
```